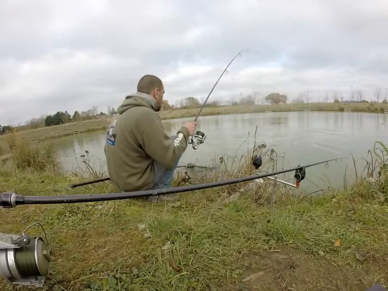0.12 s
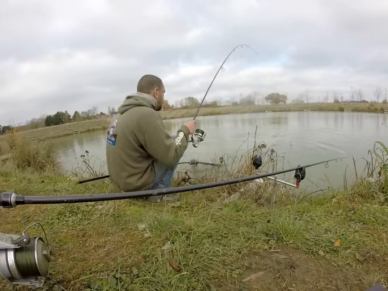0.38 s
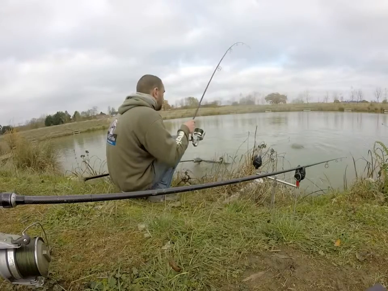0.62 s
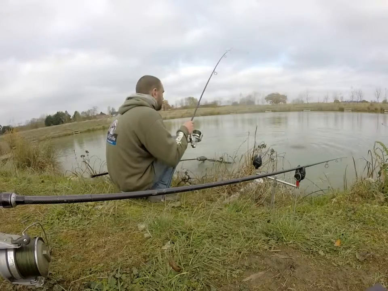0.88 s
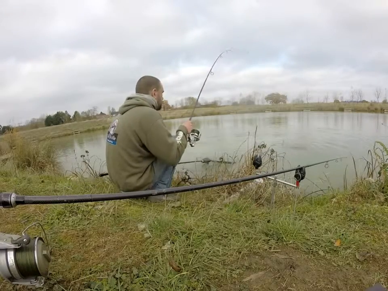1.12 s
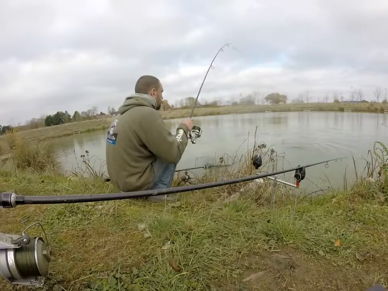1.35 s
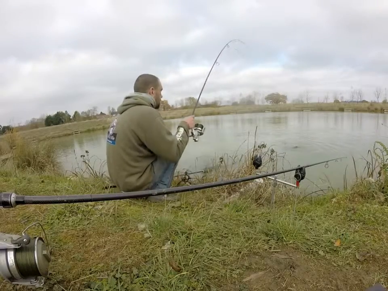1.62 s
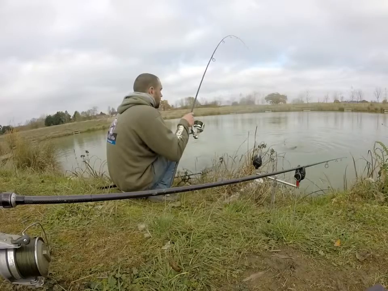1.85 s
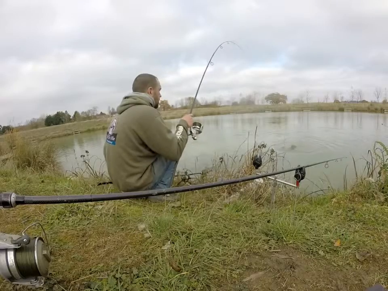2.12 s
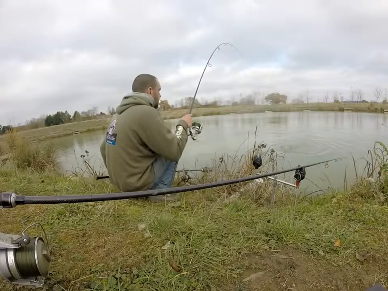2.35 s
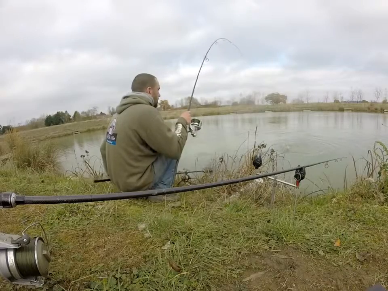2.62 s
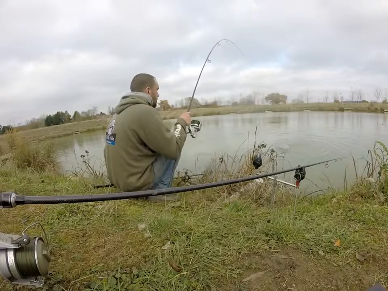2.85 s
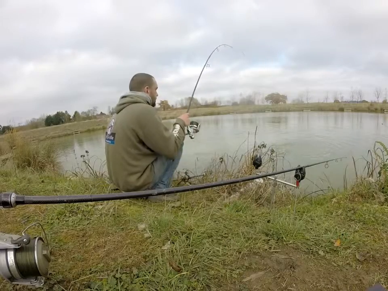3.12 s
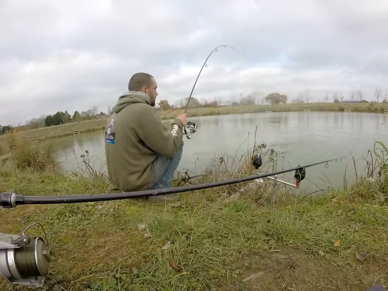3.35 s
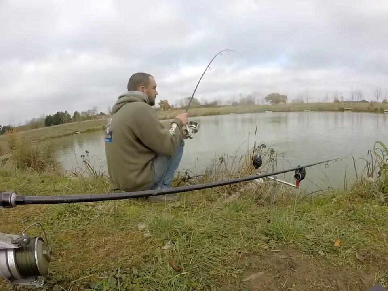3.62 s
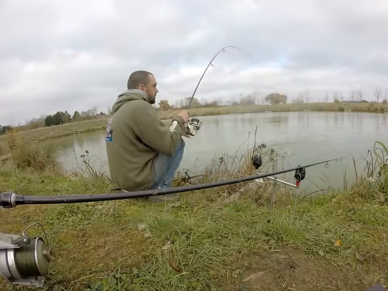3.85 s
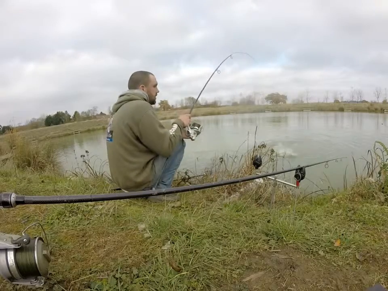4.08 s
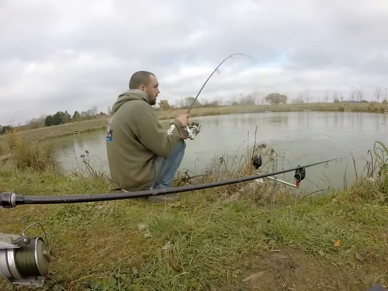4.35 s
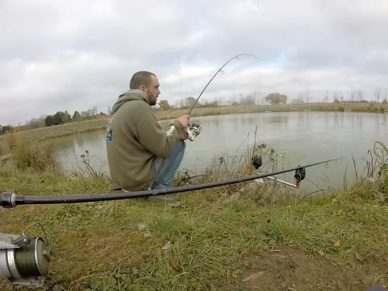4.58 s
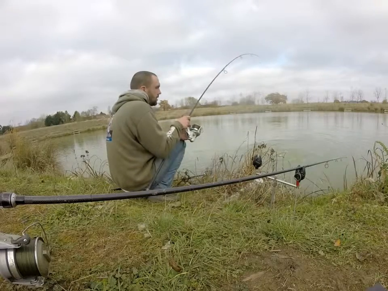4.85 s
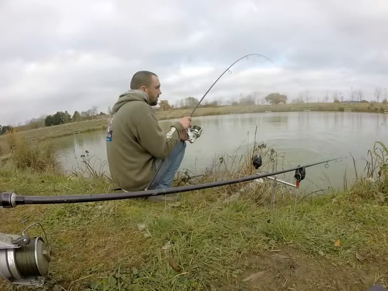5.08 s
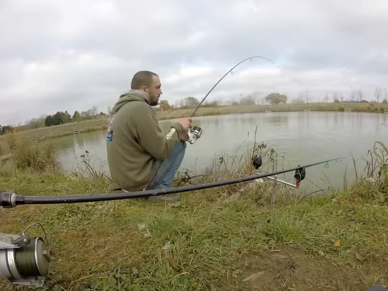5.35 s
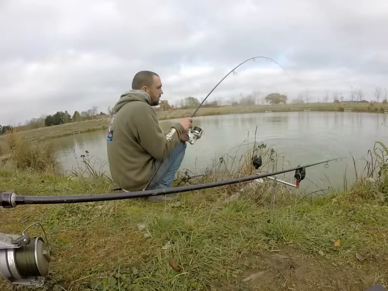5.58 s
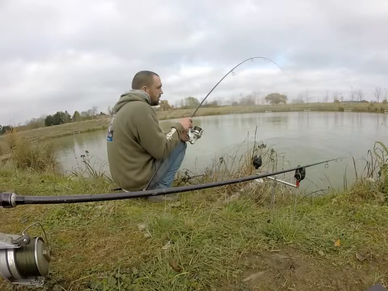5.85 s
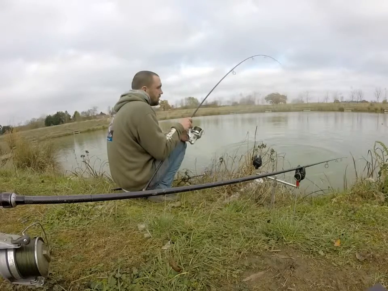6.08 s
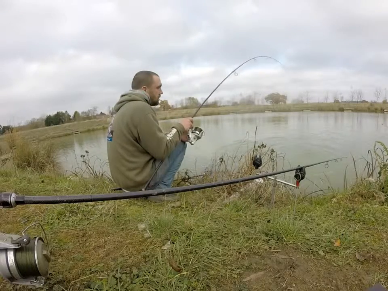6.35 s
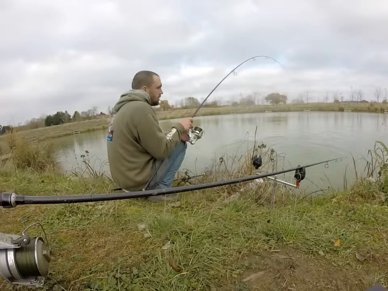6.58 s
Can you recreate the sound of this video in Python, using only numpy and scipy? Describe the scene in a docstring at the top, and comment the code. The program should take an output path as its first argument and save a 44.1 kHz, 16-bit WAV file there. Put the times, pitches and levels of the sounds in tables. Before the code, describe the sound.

A hooked fish thrashes at a pond's surface in two gulping, bubbling splash bursts, over steady low traffic rumble and faint reel ticks.

```python
"""A hooked fish thrashes at the surface of a pond, heard from a few metres inside a closed housing.
Far traffic rumbles and hisses throughout (filtered noise), with faint puffs of high hiss; at first reel and
tackle tick (short rings and snaps). From 2.6 s and again from 3.9 s the water thrashes: air pockets gulp and
ring (gliding decaying sines), froth bubbles (many small ones), drops ring and spray patters back (clicks, hiss).
At 5.6 s a far bird calls once (wavering sine); from 6.1 s a gust reaches the microphone (low noise)."""
import sys
import numpy as np
from scipy import signal
from scipy.fft import rfft, irfft
from scipy.io import wavfile

SR = 44100
rng = np.random.default_rng(int(sys.argv[2]) if len(sys.argv) > 2 else 0)


def int16_out(signal):
    """Quantize to a 16-bit WAV file."""
    q = np.round(np.clip(np.atleast_2d(signal).T, -1, 1) * 32767)
    wavfile.write(sys.argv[1], SR, q.astype(np.int16))


def gain_from_db(level_db):
    """Convert decibel levels to linear amplitude factors (20 dB per decade)."""
    decades = np.asarray(level_db, float) / 20
    return 10 ** decades


N = 295730

# Large air pockets torn into the water. Each row: start in seconds, peak in dB before roughness,
# pitch at the peak in Hz, rise time in ms, glide in octaves per rise time.
AIR_POCKETS = [(2.6569, -32, 1084, 2, 0.092), (2.6611, -26.5, 700, 1.1, -0.22),
               (2.6995, -37.5, 739, 2.0, 0), (2.9855, -35, 990, 1.4, 0.12), (3.053, -41, 880, 4, -0.033),
               (3.108, -33.5, 858, 3.7, 0), (3.1304, -30, 427, 4.7, -0.11), (3.1456, -28, 490, 1.4, -0.25),
               (3.1791, -28, 776, 2.9, 0.32), (3.1971, -21.5, 616, 1.3, -0.24),
               (3.2115, -21.5, 527, 1.7, -0.18), (3.2166, -35, 373, 8.0, -0.0026),
               (3.2168, -28, 630, 2.6, 0.053), (3.2245, -33.5, 268, 20, -0.22),
               (3.2748, -36.5, 642, 8.2, 0.21), (3.3418, -29, 820, 1.8, -0.03),
               (3.3528, -36.5, 443, 12, 0.13), (3.3656, -29, 241, 13.5, 0.1),
               (3.42, -37.5, 310.5, 14.0, 0.25), (3.5469, -42, 614, 5.5, 0.16),
               (3.5707, -37.5, 778, 6.3, 0.015), (3.6236, -42, 527, 9.5, 0.055),
               (3.9706, -22, 950, 0.6, 0.15), (3.9773, -22, 592, 2.34, -0.29),
               (3.9843, -31.5, 444, 13, 0.25), (4.0107, -25, 880, 3.9, -0.085),
               (4.0125, -33, 552, 9.3, -0.31), (4.0206, -30, 1074, 3.5, -0.13),
               (4.027, -28, 880, 3.2, -0.023), (4.055, -41, 866, 4.7, 0.29), (4.0644, -32, 457, 4, 0.29),
               (4.0757, -27.5, 856, 8.2, -0.013), (4.0824, -19.5, 580, 2.9, -0.01),
               (4.0923, -12.5, 806, 0.8, -0.2), (4.1129, -23, 613, 1.5, 0.025),
               (4.1308, -22, 816, 0.47, -0.34), (4.1553, -32.5, 655, 12, 0),
               (4.1887, -29.5, 304, 10.7, 0.37), (4.1912, -29, 715, 5.7, 0.079),
               (4.2306, -29, 739, 1.17, -0.21), (4.2376, -29.5, 760, 3.1, -0.17),
               (4.3109, -36.5, 477, 10.7, 0.13), (4.3714, -32.5, 630, 3.5, -0.091),
               (4.3896, -32, 755, 3.6, -0.021), (4.459, -36.5, 815, 6.2, 0.059),
               (4.5395, -34, 868, 5.2, 0.12), (4.9673, -40, 830, 5.1, 0.07)]
# Loudest single drops striking the water. Each row: start in seconds, peak in dB, pitch in Hz.
LOUD_DROPS = [(2.6597, -39.5, 2110), (2.6647, -38, 5900), (2.6895, -41.5, 2400), (2.7764, -47, 3240),
              (2.9826, -38, 2050), (2.9862, -34, 3340), (3.111, -40, 2370), (3.137, -36, 3045),
              (3.1469, -39, 3360), (3.1928, -33.5, 2500), (3.251, -40.5, 1830), (3.518, -40, 3045),
              (3.5547, -39.5, 5940), (3.565, -38, 2360), (3.5913, -42, 2080), (3.7564, -46, 2070),
              (3.941, -34.5, 3250), (3.9647, -30, 3283), (3.9797, -23.5, 3280), (4.0777, -36, 1850),
              (4.079, -31, 3045), (4.0856, -31, 2400), (4.2182, -36, 3240), (4.2883, -34, 3630),
              (4.2887, -37, 2100), (4.3715, -44, 2370), (4.409, -38, 6957), (4.4403, -37.5, 3450),
              (4.5806, -45, 2092), (4.752, -50, 2300)]
# Stirred water, one list per bout of thrashing. Each row: time in seconds, froth level in dB, spray level in dB.
THRASHING_BOUTS = [
    [(2.65, -66, -74), (2.76, -65, -63), (2.96, -59, -54), (3.01, -61, -60), (3.12, -60, -57.5),
     (3.22, -40, -48), (3.32, -43, -55), (3.46, -45, -50), (3.6, -47, -48.5), (3.74, -58.5, -54.5),
     (3.85, -71, -73)],
    [(3.93, -56, -72), (3.965, -44, -46.5), (4.12, -36.5, -50.5), (4.24, -38.5, -45.5),
     (4.29, -42.5, -46.5), (4.39, -38.5, -46.5), (4.51, -48, -56.5), (4.65, -52, -60), (4.92, -52, -62.5),
     (5.05, -51, -85)],
]
# Slaps of tail and body on the surface. Each row: peak time in seconds, then peak levels of
# froth, coarse spray and fine spray in dB.
BODY_SLAPS = [(2.663, -43, -49, -67), (2.704, -42, -44.5, -63), (2.986, -48, -50, -61),
              (3.074, -56, -62, -58.5), (3.145, -40.5, -38, -49), (3.198, -34, -40, -54),
              (3.25, -38.5, -45, -54), (3.376, -36, -55, -68), (3.944, -54, -49, -55),
              (3.964, -49, -37.5, -48.5), (3.978, -41, -46, -55), (4.022, -35, -56, -66),
              (4.08, -25, -34.5, -45.5), (4.296, -46, -45, -57)]
# Thrown water raining back as fine spray. Each row: peak time in seconds, peak level in dB, fall time in seconds.
SPRAY_SHOWERS = [(3.55, -53.5, 0.078), (4.31, -54, 0.056), (4.39, -55, 0.077)]
# Spectrum that the housing's cavity resonances give the spray. Each row: frequency in Hz, relative density in dB.
HOUSING_SPECTRUM = [(760, -60), (1300, 7.5), (1430, -60), (1580, -16), (1880, -10), (2360, -4.5),
                    (2730, -12.5), (3390, -2), (4340, -27.5), (5170, -8.5), (5910, -13), (6480, -3),
                    (7720, -12), (11300, -10.5), (15200, -29)]
# Ticks of reel and tackle. Each row: ring start in seconds, ring peak in dB, pitch in Hz,
# snap impulse in dB before filtering.
TACKLE_TICKS = [(0.0374, -47, 3300, -42.5), (0.091, -50, 3800, -46), (0.2688, -53, 3600, -47),
                (0.4534, -55, 3400, -52), (0.579, -51.5, 3300, -41), (0.6838, -47.5, 3300, -38),
                (0.9358, -51, 3400, -47), (1.0535, -52, 3500, -48), (1.105, -56, 5500, -55),
                (1.1476, -53, 5500, -48), (1.288, -54, 3270, -50), (1.402, -50, 3530, -25),
                (1.472, -53, 4900, -52), (2.213, -54, 3600, -33), (2.4372, -53, 3850, -41)]
# Faint high puffs, all alike. Each entry: start in seconds.
PUFF_STARTS_S = [0.079, 0.305, 0.82, 1.134, 1.646, 1.896, 2.26, 2.437, 4.571, 5.058, 5.434, 5.62, 5.906,
                 6.185, 6.413]
# Far bird call. Each row: time in seconds, pitch in Hz before wavering, level in dB before wavering.
BIRD_CALL = [(5.6, 978, -62), (5.63, 982, -54), (5.8, 990, -58), (5.825, 933, -54), (5.87, 910, -62)]
# Wind on the microphone. Each row: time in seconds, level in dB.
WIND_GUST = [(6.06, -61), (6.224, -39.5), (6.258, -38.5), (6.524, -39), (6.566, -28), (6.658, -40.5),
             (6.706, -42.5)]
# Far traffic. Each row: time in seconds, deep rumble level in dB, road hiss level in dB (297-1270 Hz).
TRAFFIC_LEVELS = [(0.0, -46.5, -52), (1.93, -47, -51), (2.6, -46.5, -49.5), (5.0, -48.5, -48.5),
                  (6.162, -47, -49), (6.706, -43.5, -50.5)]
# Spectrum of the deep rumble. Each row: frequency in Hz, relative density in dB.
RUMBLE_SPECTRUM = [(12, -44), (20, -4.5), (64, 3), (155, -7), (184, -13.5), (247, -21), (300, -13.5),
                   (390, -42.5), (660, -120)]
# Spectrum of the road hiss. Each row: frequency in Hz, relative density in dB.
ROAD_SPECTRUM = [(88, -12), (150, -1), (248, -4.5), (603, -11), (871, -4.5), (1210, -8), (1590, -19),
                 (2340, -26), (3310, -28.5), (4770, -33), (6760, -35), (7590, -37.5), (11000, -40),
                 (13300, -39), (15200, -47)]


def rms_one(x):
    """Scales to unit power."""
    return x / np.sqrt(np.mean(x ** 2) + 1e-20)


def in_time(rows, silent=None):
    """Columns of a curve at every sample; outside its span they hold, or take the silent value."""
    s, *columns = np.transpose(rows)
    return [np.interp(np.arange(N) / SR, s, column, silent, silent) for column in columns]


def colour(x, spectrum, size=8192):
    """Causal (minimum-phase) filter with the given spectrum, built by folding its cepstrum."""
    hz, db = np.transpose(spectrum)
    grid_hz = np.maximum(np.arange(size // 2 + 1), 1) * SR / size
    log_gain = np.interp(np.log(grid_hz), np.log(hz), db) * np.log(10) / 20
    cepstrum = irfft(log_gain)
    cepstrum[1:size // 2] *= 2
    cepstrum[size // 2 + 1:] = 0
    impulse_response = irfft(np.exp(rfft(cepstrum)))
    return signal.fftconvolve(x, impulse_response)[:N]


def band(x, low_hz, high_hz, order=2):
    """Band-pass."""
    return signal.sosfilt(signal.butter(order, [low_hz, high_hz], "band", fs=SR, output="sos"), x)


def drift(rate_hz):
    """Slow random wander of unit rms: noise through two equal one-pole low-passes."""
    r = np.exp(-2 * np.pi * rate_hz / SR)
    noise = rng.standard_normal(N + SR)
    settled = signal.lfilter([1], [1, -2 * r, r * r], noise)[SR:]
    return rms_one(settled)


def add_ring(out, start_s, peak_db, hz, rise_s, glide_octaves, turn):
    """Adds one ring: a sine that swells, dies away and glides in pitch; turn is its phase in cycles."""
    at = int(start_s * SR)
    u = np.arange(min(int(6 * rise_s * SR), N - at)) / (rise_s * SR)   # time in rise times
    cycles = np.cumsum(hz * 2 ** (glide_octaves * (u - 1))) / SR
    out[at:at + len(u)] += gain_from_db(peak_db) * u * np.exp(1 - u) * np.sin(2 * np.pi * (turn + cycles))


def crowd(count, low_hz, high_hz, cycles, spread_db, start_s, end_s):
    """Many small rings at random moments, sizes and strengths, most of them rising in pitch."""
    out = np.zeros(N)
    for when, pitch, size, length, rise, turn in rng.random((count, 6)):
        hz = low_hz * (high_hz / low_hz) ** pitch
        ring_start_s = start_s + when * (end_s - start_s)
        peak_db = -spread_db * np.log(size + 0.015)
        rise_s = cycles * (0.19 + length ** 2) / hz
        add_ring(out, ring_start_s, peak_db, hz, rise_s, 0.282 * rise - .05, turn)
    return out


def burst_power(peak_s, db, rise_s, fall_s):
    """Power of bursts that grow to a peak and die away, both exponentially."""
    coarse = np.arange(0, N, 16)   # every 16th sample, interpolated below
    u = coarse[:, None] / SR - peak_s
    level = gain_from_db(db) * np.exp(np.where(u < 0, u / rise_s, -u / fall_s))
    return np.interp(np.arange(N), coarse, np.sum(level ** 2, axis=1))


def pockets():
    """Big gulps: each air pocket rings from rest, and the housing stops them above its lowest cavity."""
    out = np.zeros(N)
    for start_s, peak_db, hz, rise_ms, glide_octaves in AIR_POCKETS:
        add_ring(out, start_s, peak_db, hz, rise_ms / 1000, glide_octaves, 0)
    out *= gain_from_db(2.2 * drift(70.0))   # the water wall shakes, so the ring is rough
    return signal.sosfilt(signal.butter(6, 1320, fs=SR, output="sos"), out)


def froth(start_s, end_s):
    """Small bubbles, lifted where the lowest cavity of the housing rings."""
    bubbles = crowd(count=1300, low_hz=356.8, high_hz=1304, cycles=3.53, spread_db=1.5, start_s=start_s, end_s=end_s)
    return band(bubbles, 304, 1210, order=3) + gain_from_db(6.5) * band(bubbles, 720, 1040, order=1)


def patter(clicks_per_s, spread_db, clump_db, hiss_db):
    """Clumped impacts of falling spray: sparse clicks on a bed of finer hiss."""
    born = rng.random(N) < clicks_per_s * gain_from_db(clump_db * drift(25.0)) / SR
    sizes = gain_from_db(spread_db * np.minimum(rng.exponential(1, N), 4))
    clicks = born * sizes * rng.choice([-1, 1], N)
    hiss = gain_from_db(hiss_db) * rng.standard_normal(N)
    return colour(rms_one(clicks) + hiss, HOUSING_SPECTRUM)


def spray(start_s, end_s, span):
    """Droplet rings, differentiated and coloured by the housing, over the patter of falling spray."""
    droplets = crowd(count=2200, low_hz=1502, high_hz=14960, cycles=5.03, spread_db=2.0,
                     start_s=start_s, end_s=end_s)
    rings = rms_one(colour(np.gradient(droplets), HOUSING_SPECTRUM))
    impacts = rms_one(patter(clicks_per_s=800, spread_db=3.5, clump_db=4.0, hiss_db=-8))
    return span * rings + gain_from_db(-1.5) * impacts


def churn():
    """Froth, coarse and fine spray follow the thrashing: a stirred bed, slaps on top, showers after."""
    slap_rise_s, froth_fall_s, spray_fall_s = 0.012, 0.021, 0.024   # times to change by a factor e
    shower_rise_s, fine_below_spray_db = 0.02, -14
    froth_db, spray_db = np.max([in_time(rows, silent=-120) for rows in THRASHING_BOUTS], axis=0)
    slap_s, slap_froth_db, slap_spray_db, slap_fine_db = np.transpose(BODY_SLAPS)
    shower_s, shower_db, shower_fall_s = np.transpose(SPRAY_SHOWERS)

    froth_slaps = burst_power(slap_s, slap_froth_db, slap_rise_s, froth_fall_s)
    spray_slaps = burst_power(slap_s, slap_spray_db, slap_rise_s, spray_fall_s)
    fine_slaps = burst_power(slap_s, slap_fine_db, slap_rise_s, spray_fall_s)
    showers = burst_power(shower_s, shower_db, shower_rise_s, shower_fall_s)
    froth_gain = np.sqrt(gain_from_db(froth_db) ** 2 + froth_slaps)
    spray_gain = np.sqrt(gain_from_db(spray_db) ** 2 + spray_slaps)
    fine_gain = np.sqrt(gain_from_db(spray_db + fine_below_spray_db) ** 2 + fine_slaps + showers)

    start_s, end_s = 2.63, 5.05
    span = np.sqrt((end_s - start_s) * SR / N)   # rms over all N of a unit-rms sound within the span
    foam = froth(start_s, end_s)
    all_spray = spray(start_s, end_s, span)
    coarse = band(all_spray, 1400, 4500, order=3)
    fine = band(all_spray, 4500, 15500, order=3)
    return span * (froth_gain * rms_one(foam) + spray_gain * rms_one(coarse) + fine_gain * rms_one(fine))


def drops():
    """Each drop leaves one short ring, a few cycles long."""
    out = np.zeros(N)
    rise_cycles = 2.65
    for (start_s, peak_db, hz), turn in zip(LOUD_DROPS, rng.random(len(LOUD_DROPS))):
        add_ring(out, start_s, peak_db, hz, rise_cycles / hz, .02, turn)
    return out


def tackle(rise_cycles):
    """Small metal ticks, a ring plus a broad snap at its peak, among fainter random ones."""
    rings, snaps = np.zeros(N), np.zeros(N)
    for (start_s, ring_db, hz, snap_db), turn in zip(TACKLE_TICKS, rng.random(len(TACKLE_TICKS))):
        rise_s = rise_cycles / hz
        add_ring(rings, start_s, ring_db, hz, rise_s, 0, turn)
        snaps[int((start_s + rise_s) * SR)] = gain_from_db(snap_db)
    faint = crowd(count=90, low_hz=2600, high_hz=7500, cycles=6.0, spread_db=1.5, start_s=0, end_s=2.7)
    snap = band(snaps, 3300, 7000) + gain_from_db(-9) * band(snaps, 7000, 13500)
    return rings + snap + gain_from_db(-64) * faint


def puffs(level_db=-65, rise_s=.012, fall_s=.03):
    """Soft bursts of very high hiss: exponential onset, Gaussian fall."""
    t, shape = np.arange(N) / SR, np.zeros(N)
    for start_s in PUFF_STARTS_S:
        u = np.maximum(t - start_s, 0)
        shape += gain_from_db(level_db) * (1 - np.exp(-u / rise_s)) * np.exp(-(u / fall_s) ** 2)
    noise = rng.standard_normal((2, N))
    upper = rms_one(band(noise[0], 11500, 14300))
    lower = rms_one(band(noise[1], 6000, 11500))
    return shape * (upper + gain_from_db(-3) * lower)


def far_call():
    """A bird's slightly rough whistle near the edge of hearing: a sine wavering in pitch and level."""
    hz = in_time(BIRD_CALL)[0] + 12 * drift(30.0)
    db = in_time(BIRD_CALL, silent=-120)[1] + 4 * drift(25.0)
    return np.sqrt(2) * gain_from_db(db) * np.sin(2 * np.pi * np.cumsum(hz) / SR)


def gust():
    """Lumpy wind eddies as low noise; a stronger puff reaches higher in pitch."""
    db, = in_time(WIND_GUST, silent=-120)
    noise = rng.standard_normal((2, N))
    slow = rms_one(band(noise[0], 28.3, 45.0))
    quick = rms_one(band(noise[1], 59, 104))
    quick_share = np.clip((db + 41.5) / 18, 0, 1)   # of the power
    return gain_from_db(db) * (np.sqrt(1 - quick_share) * slow + np.sqrt(quick_share) * quick)


def traffic():
    """Far roads: a deep wavering rumble under a broad, nearly steady hiss."""
    rumble_db, road_db = in_time(TRAFFIC_LEVELS)
    noise = rng.standard_normal((2, N))
    rumble = colour(noise[0], RUMBLE_SPECTRUM) * gain_from_db(0.96 * drift(1.5))
    road = colour(noise[1], ROAD_SPECTRUM)
    road /= band(road, 297, 1270, order=4).std()
    middle = band(road, 126.6, 1427)
    rest = road - band(road, 112, 2056)
    rest_db = np.mean(road_db) + .5 * drift(8.6)
    return gain_from_db(rumble_db) * rms_one(rumble) + gain_from_db(road_db) * middle + gain_from_db(rest_db) * rest


def scene():
    """Water with a short band-limited echo from the bank, then the surroundings."""
    water = pockets() + churn() + drops()
    lag = int(.011 * SR)
    water[lag:] += gain_from_db(-14.5) * band(water, 280, 4300)[:-lag]
    return (water + tackle(rise_cycles=3.0) + puffs() + far_call() + gust() + traffic())[None]


def low_pass(x):
    """Removes everything above the highest recorded frequency."""
    return signal.sosfilt(signal.butter(12, 15380, fs=SR, output="sos"), x)


def record(dry):
    """A steep low-pass cuts the end of the top octave."""
    cut = signal.sosfilt(signal.cheby2(14, 45, 15650, fs=SR, output="sos"), dry)
    return low_pass(cut)


dry = scene()
out = record(dry)
int16_out(out)
```